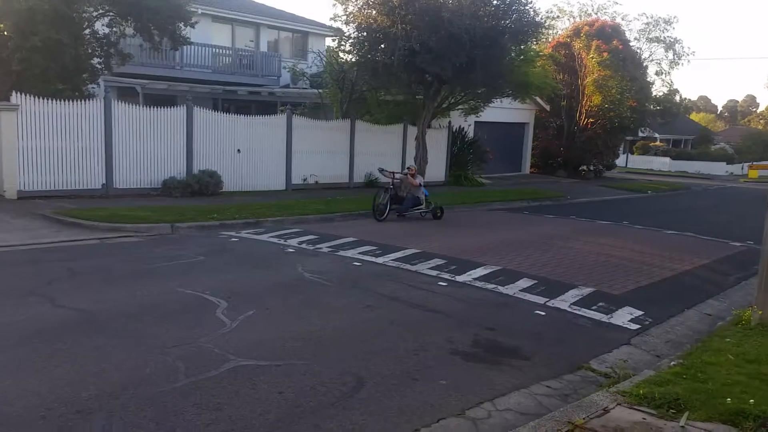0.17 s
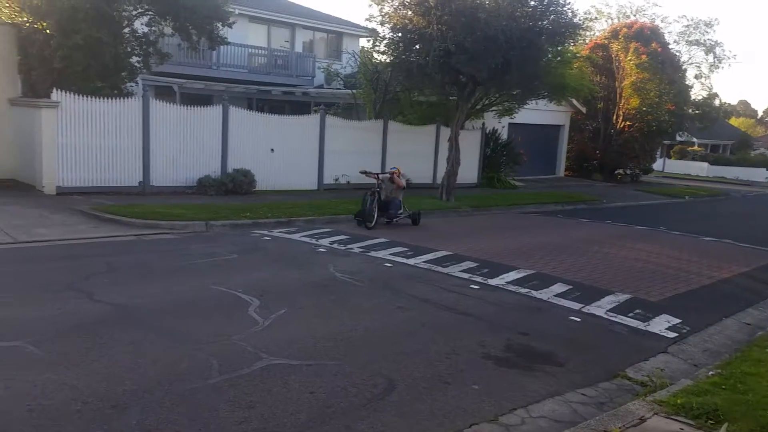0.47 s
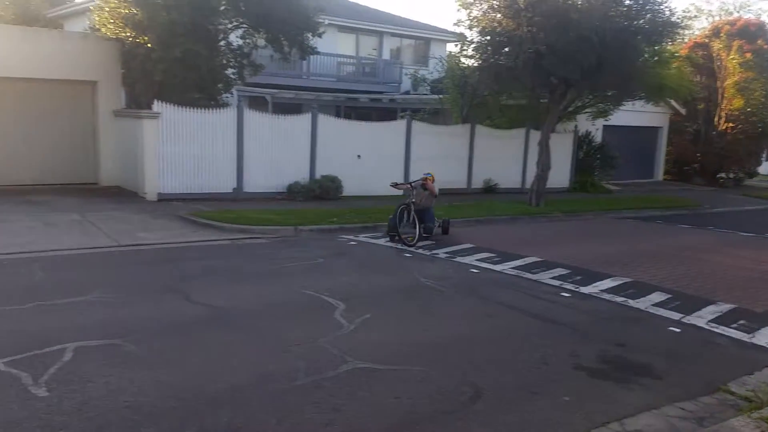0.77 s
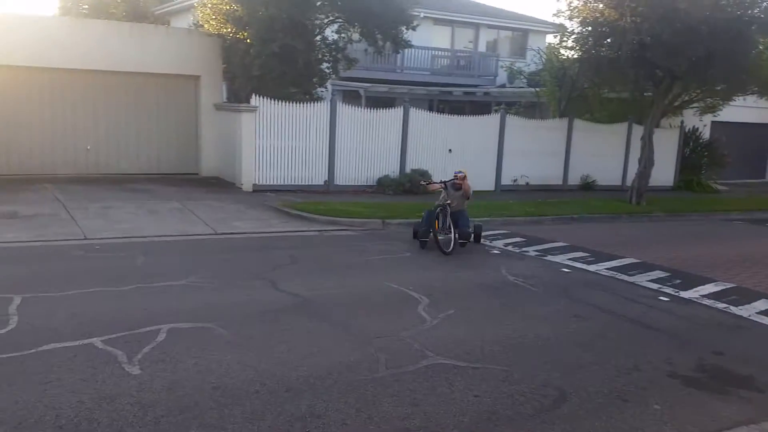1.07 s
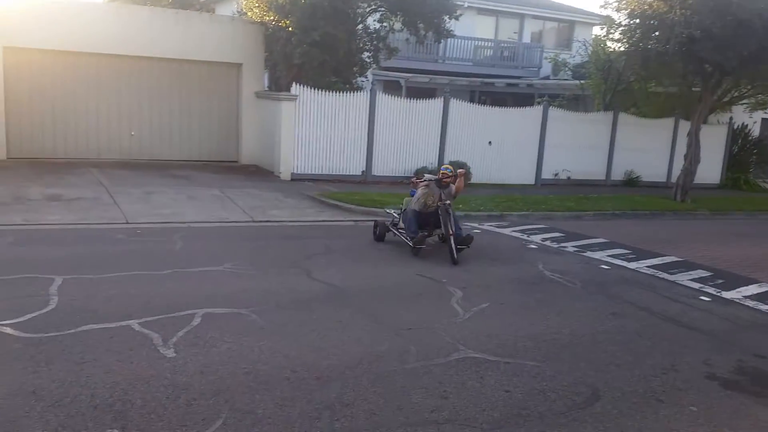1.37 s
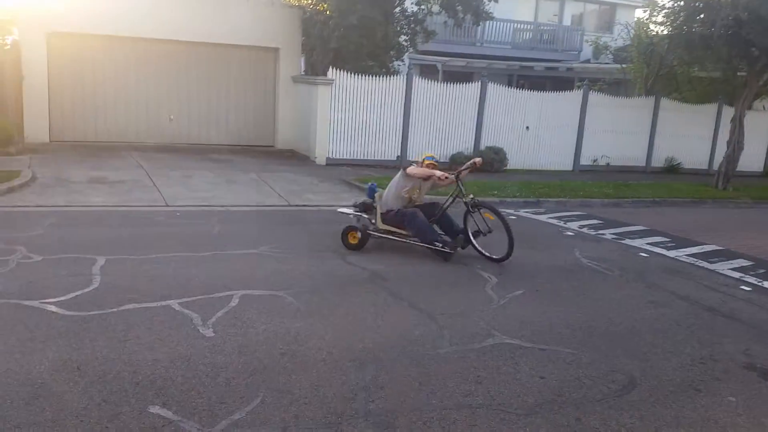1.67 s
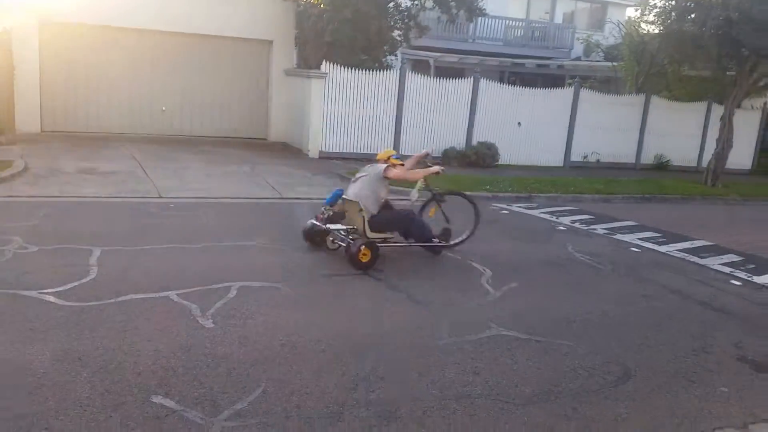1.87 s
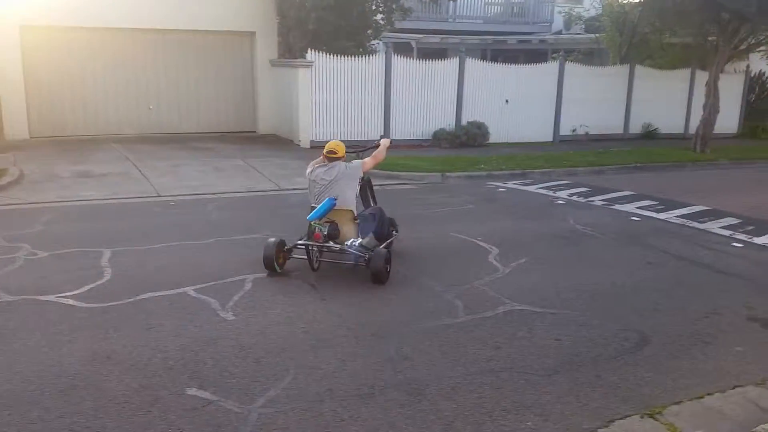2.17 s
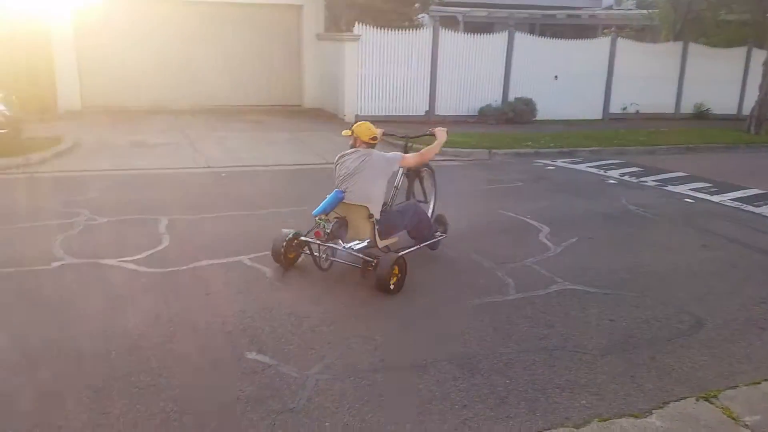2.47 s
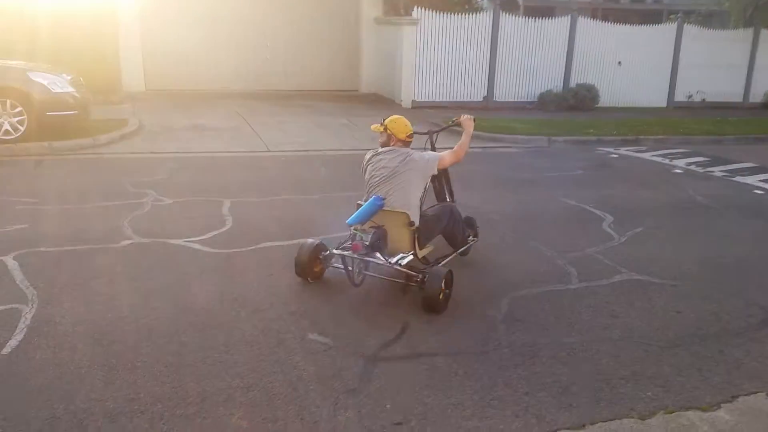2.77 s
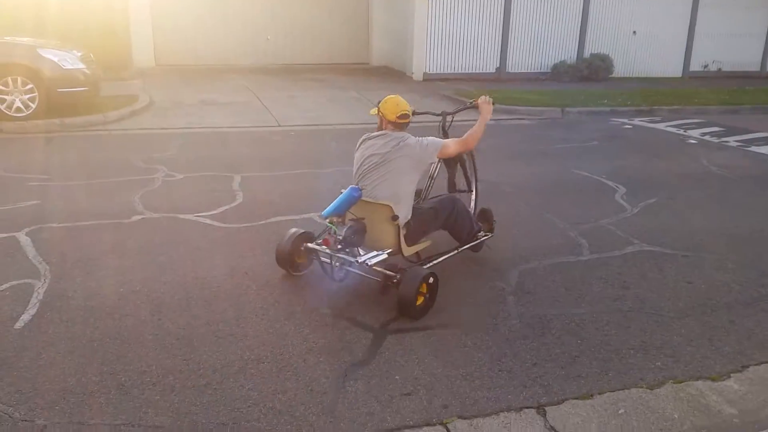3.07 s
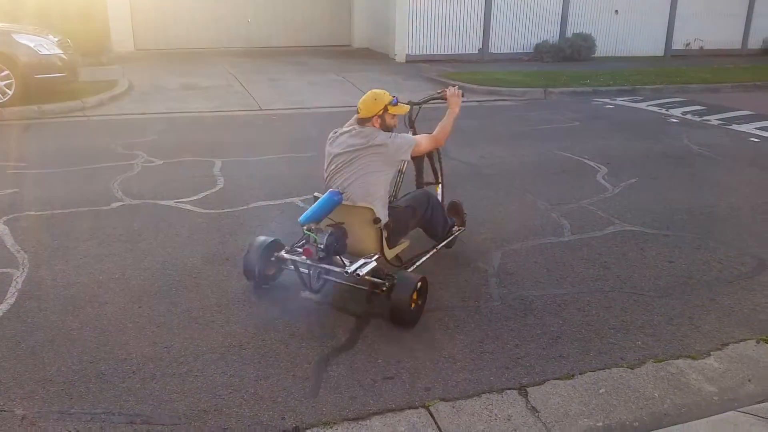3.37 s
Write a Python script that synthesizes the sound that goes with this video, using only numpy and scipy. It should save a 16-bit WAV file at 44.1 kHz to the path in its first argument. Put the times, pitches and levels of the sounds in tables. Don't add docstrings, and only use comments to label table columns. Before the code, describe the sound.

A raspy two-stroke motor revs, dips and misfires while a drifting trike scrapes along the street

```python
import sys
import numpy as np
from scipy import signal
from scipy.fft import rfft, irfft
from scipy.io import wavfile

SR = 44100
rng = np.random.default_rng(int(sys.argv[2]) if len(sys.argv) > 2 else 0)


def voltage_ratio(decibels):
    exponent = np.asarray(decibels, float) / 20
    return 10 ** exponent


def int16_out(signal):
    q = np.round(np.clip(np.atleast_2d(signal).T, -1, 1) * 32767)
    wavfile.write(sys.argv[1], SR, q.astype(np.int16))


N = 155673
T = np.arange(N) / SR


def in_time(rows):
    s, *columns = np.transpose(rows)
    return [np.interp(T, s, c) for c in columns]


def rms_one(x):
    return x / np.sqrt(np.mean(x ** 2) + 1e-20)


def colour(x, *tables):
    size = 2 ** 14
    log_hz = np.log(np.maximum(np.fft.rfftfreq(size, 1 / SR), 1))
    db = 0
    for table in tables:
        hz, table_db = np.transpose(table)
        db = db + np.interp(log_hz, np.log(hz), table_db)
    cepstrum = irfft(np.log(voltage_ratio(db)))
    cepstrum[1:size // 2] *= 2
    cepstrum[size // 2 + 1:] = 0
    impulse = irfft(np.exp(rfft(cepstrum)))[:size // 2]
    return signal.fftconvolve(x, impulse)[:N]


def delayed(x, s):
    return np.interp(np.arange(N) - s * SR, np.arange(N), x)


def drift(rate_hz):
    r = np.exp(-2 * np.pi * rate_hz / SR)
    noise = rng.standard_normal(N + SR)
    return rms_one(signal.lfilter([1], [1, -2 * r, r * r], noise)[SR:])


def clicks(s, sizes):
    at = np.clip(s * SR, 0, N - 2)
    first, part = at.astype(int), at % 1
    out = np.zeros(N)
    np.add.at(out, first, sizes * (1 - part))
    np.add.at(out, first + 1, sizes * part)
    return out


def pair(make):
    own_share = 0.45
    shared = np.sqrt(1 - own_share) * make()
    left = shared + np.sqrt(own_share) * make()
    right = shared + np.sqrt(own_share) * make()
    return np.array([left, right])


def resonate(x, peaks, gains=None):
    out = 0
    for k, (hz, width_hz, db) in enumerate(peaks):
        r = np.exp(-np.pi * width_hz / SR)
        poles = [1, -2 * r * np.cos(2 * np.pi * hz / SR), r * r]
        ring = (1 - r * r) / 2 * signal.lfilter([1, 0, -1], poles, x + 1e-18)
        gain = 1 if gains is None else gains[k]
        out = out + (-1) ** k * gain * voltage_ratio(db) * ring
    return out


def turning(peaks):
    swing_db, swing_hz = 2.5, 2.5
    return voltage_ratio(swing_db * np.array([drift(swing_hz) for _ in peaks]))


# time in seconds, firings per second in Hz.
SPEED = [(0,89),(.06,91.4),(.42,97.7),(.49,93.74),(.55,80.1),(.7,66.6),(.76,71.49),(.84,89.36),(.96,96.11),(1.31,98.3),(1.46,110.2),(1.62,111.8),(1.69,106.5),(1.83,85.97),(2,85),(2.14,92.53),(2.62,100.6),(3.53,103)]


def crank():
    hunt_from_s, hunt_hz, hunt_depth, hunt_low_at_s = 2.6, 2.55, 0.017, 3.04
    hz, = in_time(SPEED)
    hunt_in = np.clip(2 * (T - hunt_from_s), 0, 1)
    hunt = hunt_depth * hunt_in * np.cos(2 * np.pi * hunt_hz * (T - hunt_low_at_s))
    turns = np.cumsum(hz * (1 - hunt)) / SR
    number = np.arange(1, int(turns[-1]))
    return np.interp(number, turns, T), number


# time in seconds, weakness of every second firing 0-1, random misfire 0-1.
MISFIRE = [(0, .03, .06), (.46, .03, .06), (.52, .12, .28), (.78, .25, .22), (.86, .03, .06),
           (1.35, .02, .05), (1.66, .03, .08), (1.72, .15, .3), (1.85, .3, .12), (2.08, .4, .07),
           (2.22, .03, .03), (3.53, .01, .025)]


def firing_power(s, number):
    weak, wild = (column[(s * SR).astype(int)] for column in in_time(MISFIRE))
    alternate = weak * (-1.) ** number
    return np.clip(1 - alternate + wild * rng.standard_normal(len(s)), 0, 1.6)


# frequency in Hz, level in dB.
THUMP = [(35, -36), (65, -7), (100, 2.5), (200, -1), (300, -4), (400, -11), (480, -25.5), (800, -48.5)]
# frequency in Hz, width in Hz, level in dB.
BURBLE = [(251, 107, -0.53), (347, 67, -0.47)]


def thump_and_burble(s, power):
    follows, after_s = 0.7, 0.0035
    pulse = clicks(s + after_s, 1 + follows * (power - 1))
    burble = rms_one(resonate(clicks(s, power - 1), BURBLE))
    return rms_one(colour(pulse, THUMP)) + voltage_ratio(-12) * burble


def pipe_kicks(s, power):
    jitter_s, spread_db = 0.00002, 0.6
    late = jitter_s * rng.standard_normal(len(s))
    return clicks(s + late, power * voltage_ratio(spread_db * rng.standard_normal(len(s))))


# frequency in Hz, width in Hz, level in dB.
DRONE = [(500, 45.6, -3), (674, 236, -2)]


def drone(kicks):
    return rms_one(resonate(kicks, DRONE))


# frequency in Hz, width in Hz, level in dB.
BARK = [(860, 110, 0)]


def bark(kicks):
    return rms_one(resonate(resonate(kicks, BARK), [(811, 240, 0)]))


# frequency in Hz, width in Hz, level in dB.
RASP = [(1100, 150, -7), (1415, 113, 0), (1630, 43, 0), (1860, 57, -0.5), (2335, 77, -2.5)]


def rasp(kicks):
    return rms_one(resonate(kicks, RASP, np.sqrt(turning(RASP))))


# frequency in Hz, level in dB.
SPIT = [(500, -35), (1200, 5), (2300, 6), (3500, 4.5), (5500, -23), (8500, 1), (12500, -14), (16000, 0.5)]
# frequency in Hz, width in Hz, level in dB.
FINS = [(5148, 174, 7.5), (5920, 250, 5), (8760, 370, 2), (11800, 350, -2), (12620, 450, 3),
        (13540, 630, 3)]


def spit_and_fins(s, power, rasp_db):
    after_s, decay_s, spread_db, steady = 0.0026, 0.0016, 1.6, 0.17
    r = np.exp(-1 / (decay_s * SR))
    puffs = clicks(s + after_s, power ** 0.95 * voltage_ratio(spread_db * rng.standard_normal(len(s))))
    gate = signal.lfilter([1], [1, -r], puffs) + steady
    facing = turning(FINS)
    fins_gain = voltage_ratio(-0.5 + 0.29 * (rasp_db + 28.5))

    def gas():
        hiss = rms_one(colour(gate * rng.standard_normal(N), SPIT))
        fins = rms_one(resonate(gate * rng.standard_normal(N), FINS, facing))
        return hiss + fins_gain * fins
    return pair(gas)


# time in seconds, then thump, muffler drone,
# bark, rasp and spit levels in dB.
ENGINE = [(0,-18.5,-25,-42,-35,-28.5),(.2,-18,-30.5,-22.5,-33.5,-43),(.43,-20,-22.5,-35,-44,-35),(.53,-21.5,-33,-46,-35,-34),(.75,-22.5,-28,-77,-38,-36),
          (.95,-17.5,-24,-27.5,-44,-40),(1.3,-18,-25.5,-23,-36,-27),(1.42,-19.5,-24.5,-43,-42,-33.5),(1.63,-20,-27,-39,-43,-26.5),(1.72,-24.5,-32.5,-70,-34.5,-28.5),
          (2,-20.5,-29.5,-66.5,-32,-24),(2.2,-16.5,-40.5,-41,-27,-28.5),(2.45,-16,-33.5,-27.5,-23.5,-24.5),(2.75,-16,-35,-21,-22.5,-23.5),(3.05,-17,-34,-19.5,-26,-23.5),(3.53,-17.5,-30,-17.5,-28.5,-24.5)]


def engine():
    thump_db, drone_db, bark_db, rasp_db, spit_db = in_time(ENGINE)
    s, number = crank()
    power = firing_power(s, number)
    kicks = pipe_kicks(s, power)
    tone = voltage_ratio(thump_db) * thump_and_burble(s, power)
    tone += voltage_ratio(drone_db) * drone(kicks)
    tone -= voltage_ratio(rasp_db) * rasp(kicks)
    tone -= voltage_ratio(bark_db) * bark(kicks)
    return tone, voltage_ratio(spit_db) * spit_and_fins(s, power, rasp_db)


# time in seconds, extra path in metres, level in dB.
FENCE = [(0, 1.68, -12), (.23, 1.8, -2), (.42, 2.28, -12), (.85, 3.65, 2), (.94, 2.8, -19), (1.1, 5.5, -2),
         (1.21, 4.55, -5.5), (1.36, 6.2, -5.5), (1.52, 8.04, -5), (1.63, 9.3, -2.5), (1.73, 11, -44),
         (2.0, 16.3, -11.5), (2.4, 13.1, -21.5), (3.53, 12.56, -38)]


def fence_echo(tone):
    metres, db = in_time(FENCE)
    return voltage_ratio(db) * delayed(tone, metres / 343)


# time in seconds, level in dB.
SLIDE = [(0,-25),(.49,-21.5),(.61,-25),(.72,-25),(.85,-21.5),(1.17,-15.5),(1.47,-14.5),(1.58,-15.5),(1.76,-19),(1.95,-25),(2.2,-20),(2.66,-28),(3.53,-24)]
# frequency in Hz, level in dB.
SCRAPE = [(120, -3.5), (300, -4.5), (820, 7), (1000, -1), (1400, 1), (3200, -1.5), (7000, -2.5),
          (16000, -12)]


def wheels():
    grit_per_s, grit_db, patchy_db = 1400, -13.5, 1.24
    db, = in_time(SLIDE)

    def scrape():
        struck = rng.random(N) < grit_per_s / SR
        grit = struck * rng.standard_normal(N) * rng.exponential(1, N)
        return rms_one(colour(rng.standard_normal(N) + voltage_ratio(grit_db) * rms_one(grit), SCRAPE))
    skid = voltage_ratio(db + patchy_db * (drift(2.4) + drift(35))) * pair(scrape)
    roar_below_hz, roar_follows = 3300, 0.53
    roar = signal.sosfilt(signal.butter(1, roar_below_hz, fs=SR, output="sos"), skid)
    held_back = voltage_ratio(-(1.5 - roar_follows) * np.maximum(db - db.mean(), 0))
    return skid + (held_back - 1) * roar


# time in seconds, level in dB.
GUST = [
    (0, 14),
    (.5, 22),
    (.85, 1),
    (1.6, -18),
    (1.8, 28),
    (2.15, 13),
    (2.4, -1),
    (3.53, -9),
]
# frequency in Hz, level in dB.
WIND = [(15, -16), (35, -7), (70, 18), (150, -5), (400, -40)]


def wind():
    db, = in_time(GUST)

    def port():
        lumps_db = 4.7 * drift(7.4)
        return voltage_ratio(-51.5 + db + lumps_db) * rms_one(colour(rng.standard_normal(N), WIND))
    return np.array([port(), voltage_ratio(-7) * port()])


def scene():
    tone, spit = engine()
    return tone + fence_echo(tone) + spit + wheels() + wind()


# frequency in Hz, level in dB.
LEFT_PORT = [(400, 0.5), (1200, 3), (3500, 2), (5200, 4), (8600, 7.5), (9900, -2.5), (13800, -4),
             (15500, 2.5)]
RIGHT_SHADOW = [(100, -.6), (400, -2.9), (600, -2), (1200, -4.5), (1900, -6), (2600, 3.7), (3700, -12.5),
                (4300, -5.5)]
RIGHT_PORT = [(4300, 0.5), (5300, -17.5), (7000, -10.5), (8600, -15), (9800, 6), (11500, 15), (13800, 10.5),
              (15500, 9)]


def microphone(dry):
    right_lag_s, cutoff_hz = 0.0001071, 15980
    left = colour(dry[0], LEFT_PORT)
    right = delayed(colour(dry[1], RIGHT_SHADOW, RIGHT_PORT), right_lag_s)
    rounded = 0.9 * np.tanh(np.array([left, right]) / 0.9)
    return signal.sosfilt(signal.cheby2(20, 50, cutoff_hz, fs=SR, output="sos"), rounded)


def top_cut(x):
    return signal.sosfilt(signal.butter(12, 16130, fs=SR, output="sos"), x)


def record(dry):
    return top_cut(microphone(dry))


dry = scene()
out = record(dry)
int16_out(out)
```